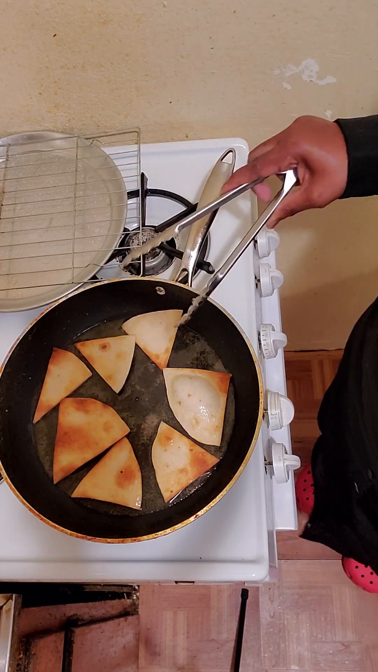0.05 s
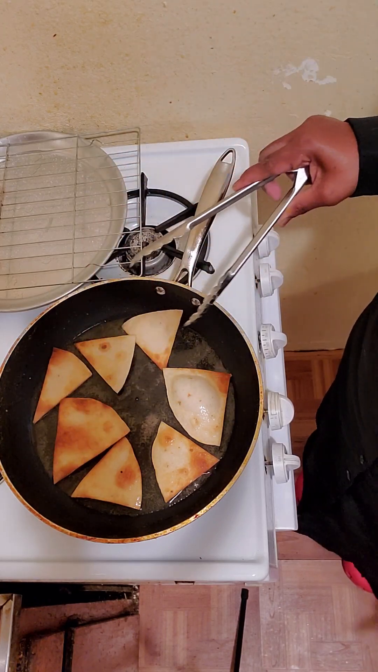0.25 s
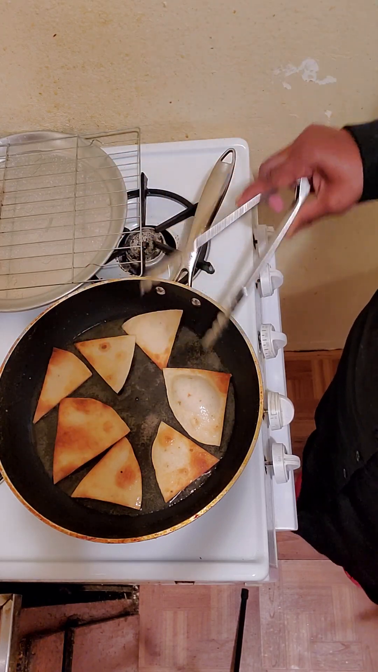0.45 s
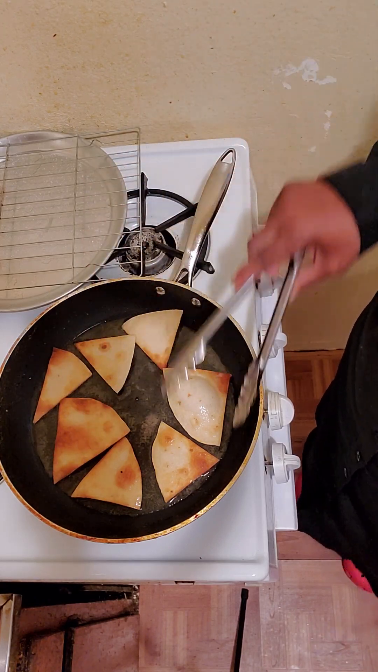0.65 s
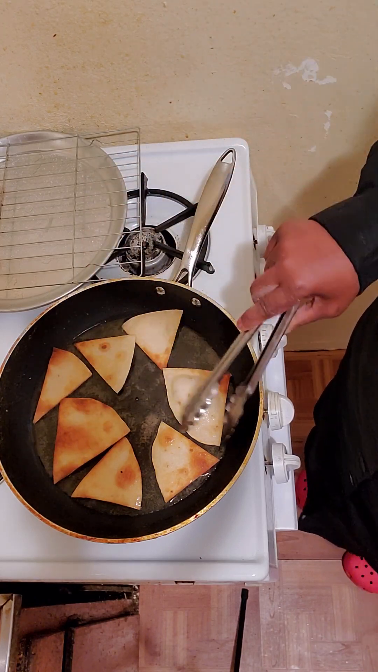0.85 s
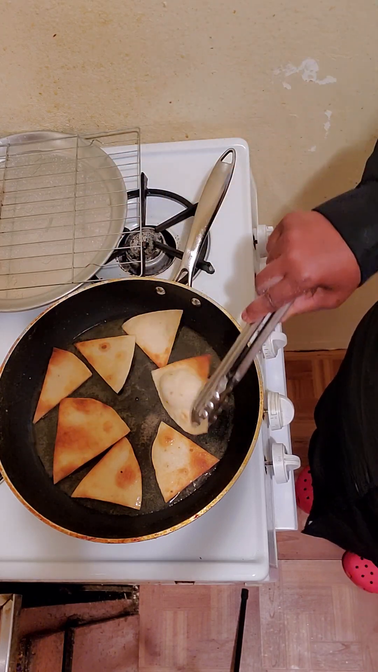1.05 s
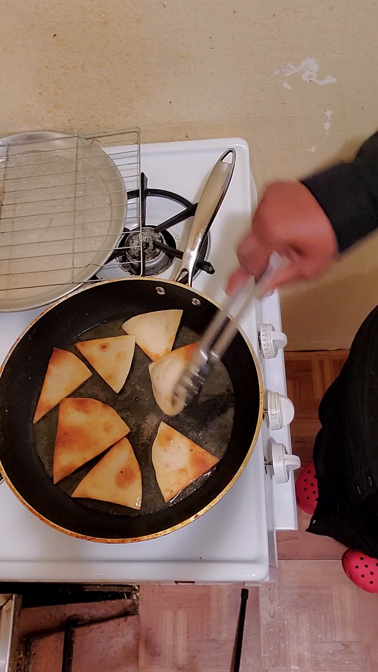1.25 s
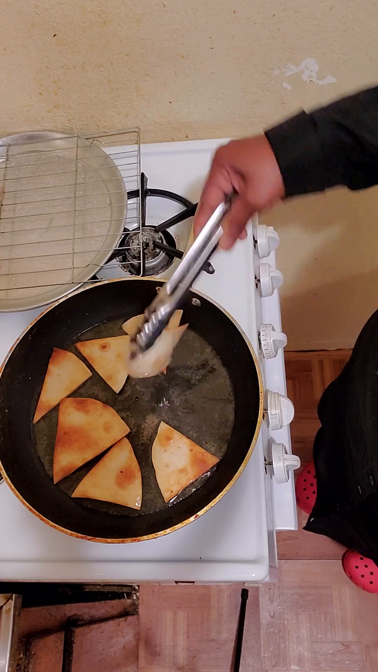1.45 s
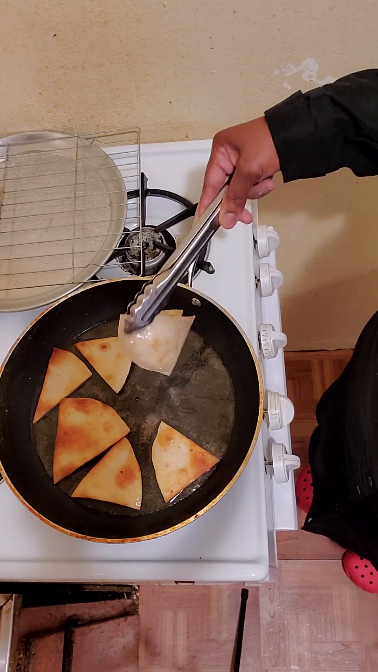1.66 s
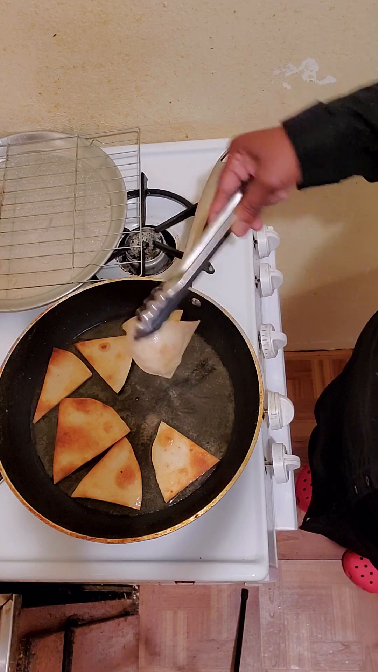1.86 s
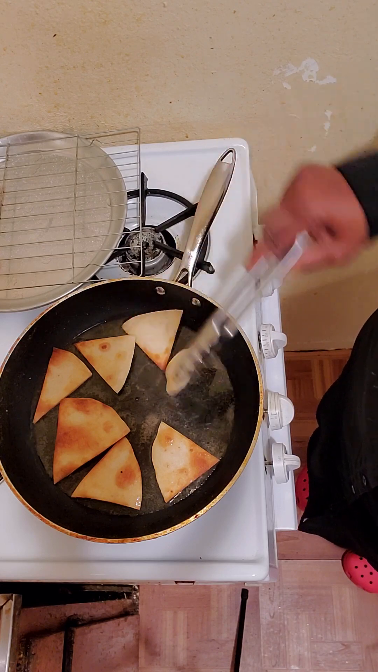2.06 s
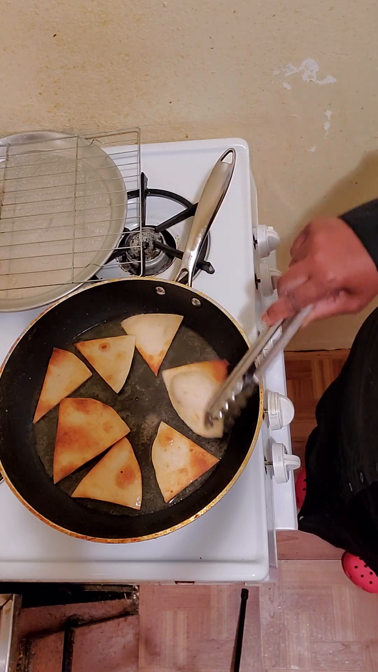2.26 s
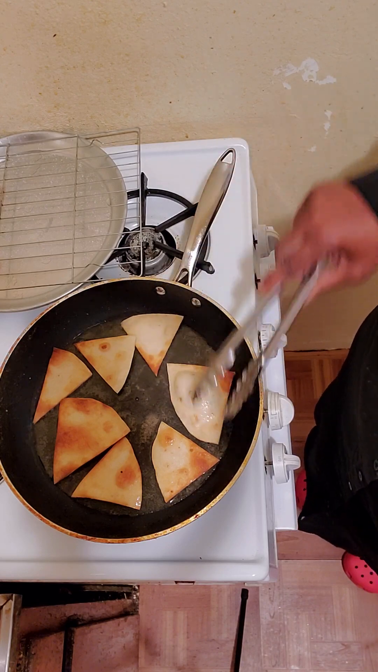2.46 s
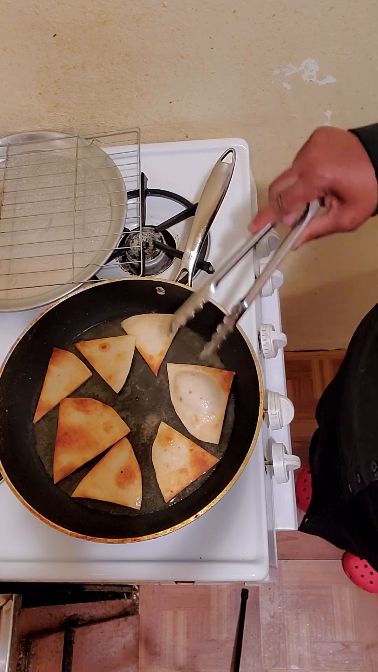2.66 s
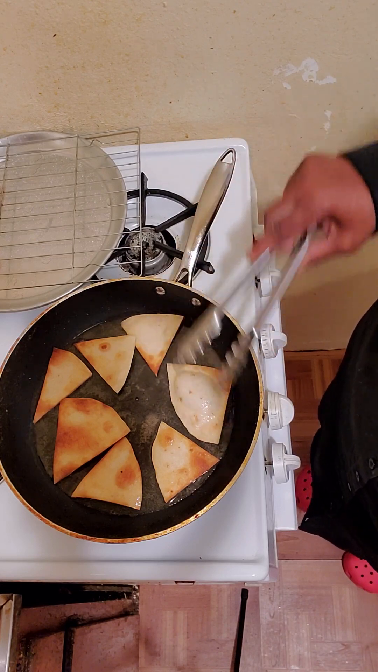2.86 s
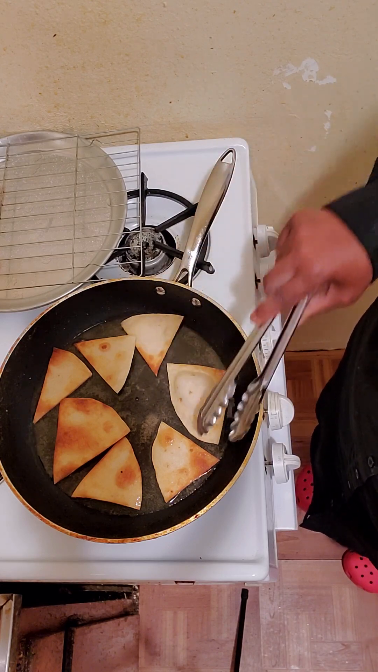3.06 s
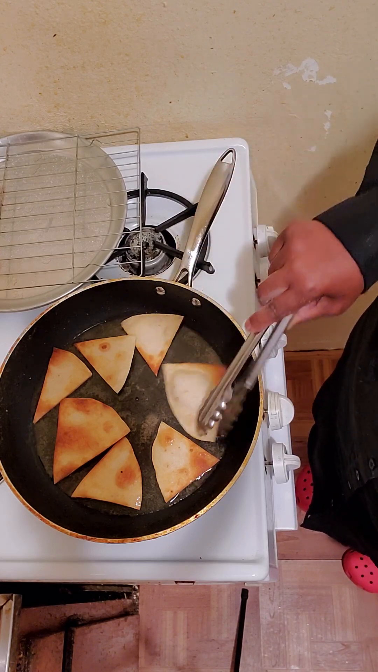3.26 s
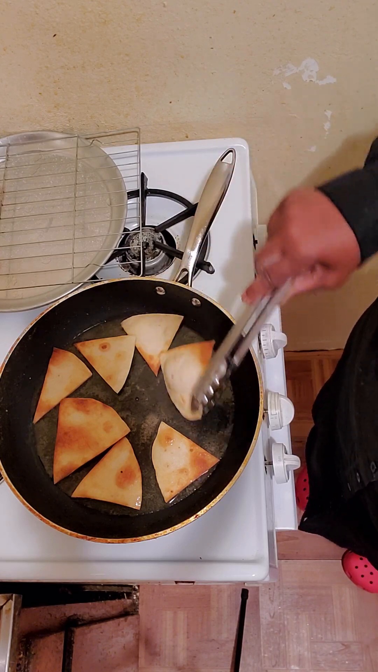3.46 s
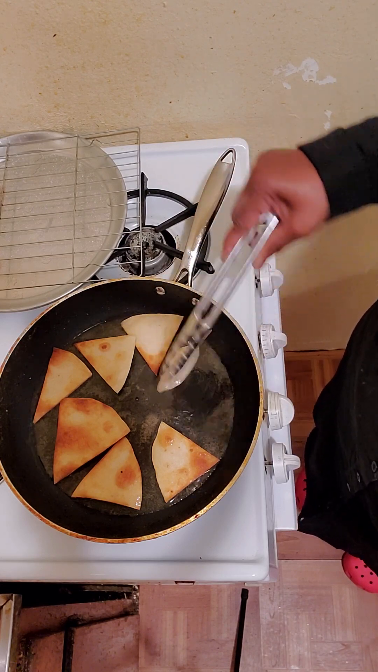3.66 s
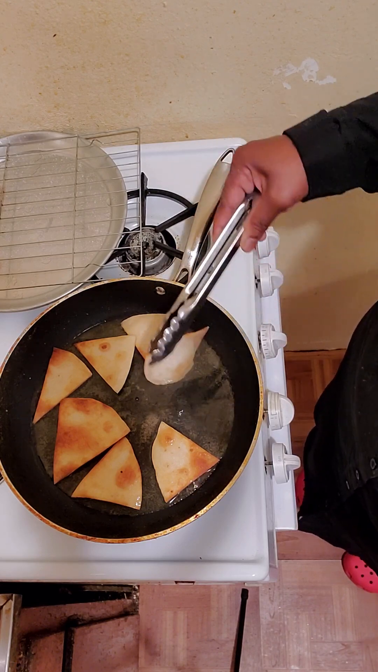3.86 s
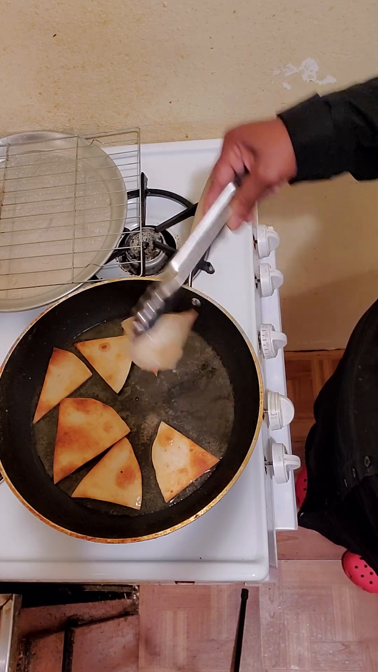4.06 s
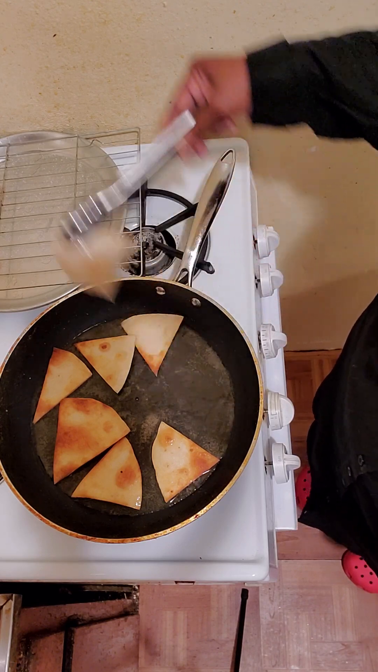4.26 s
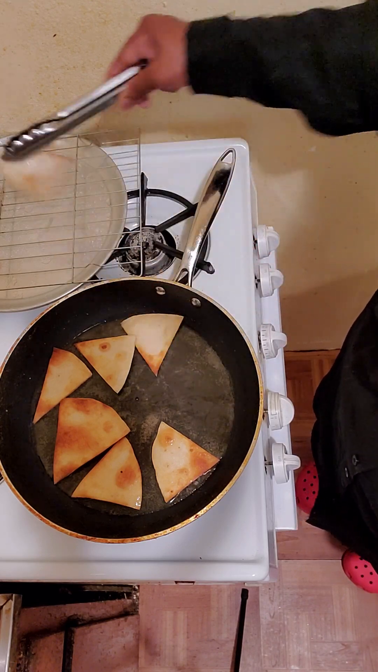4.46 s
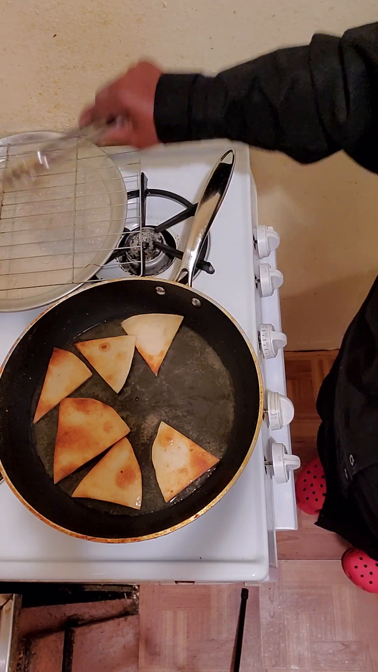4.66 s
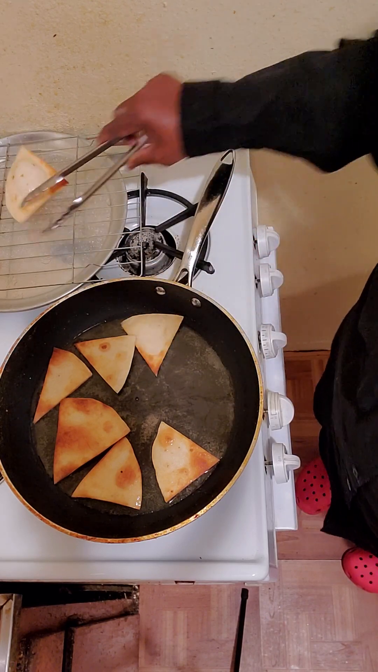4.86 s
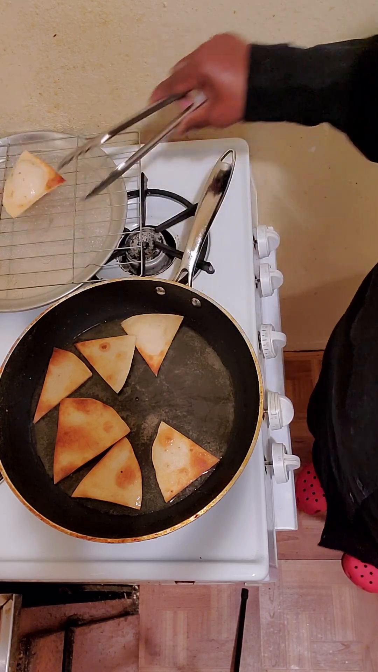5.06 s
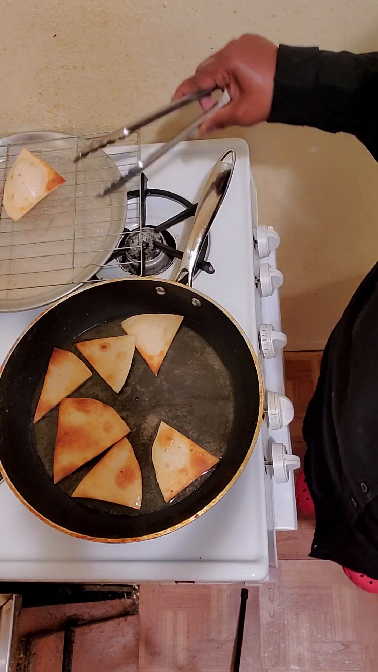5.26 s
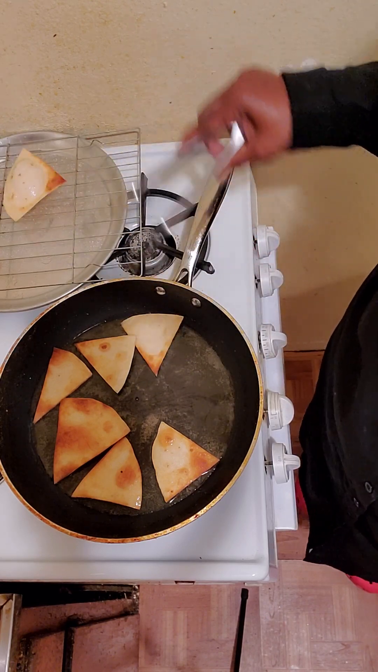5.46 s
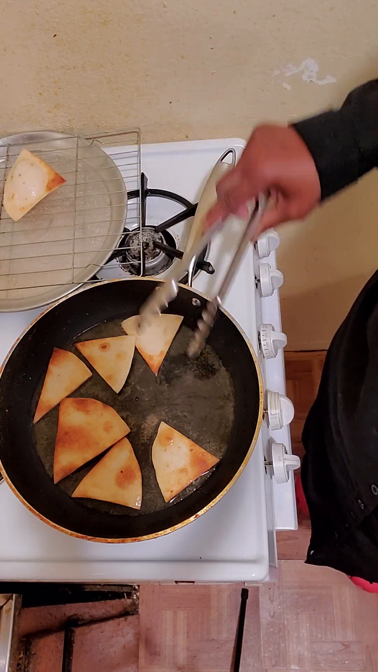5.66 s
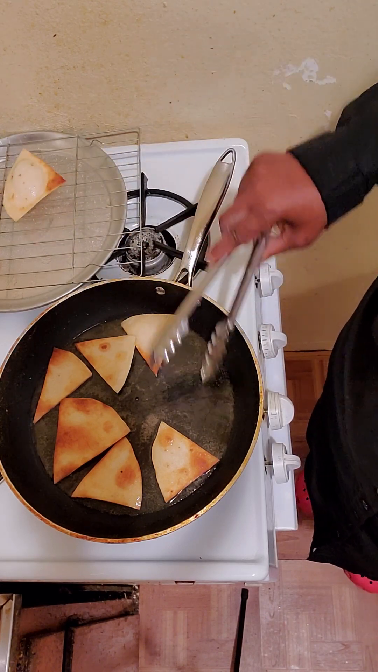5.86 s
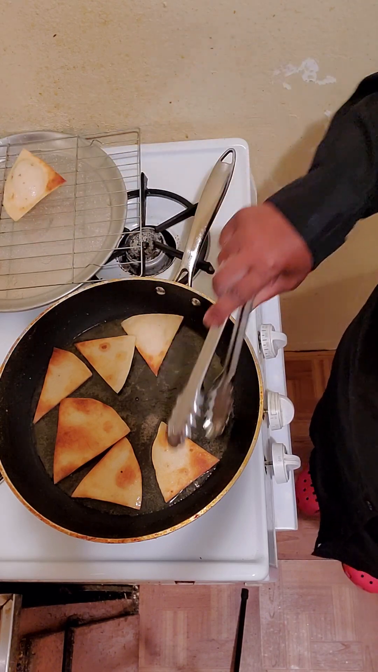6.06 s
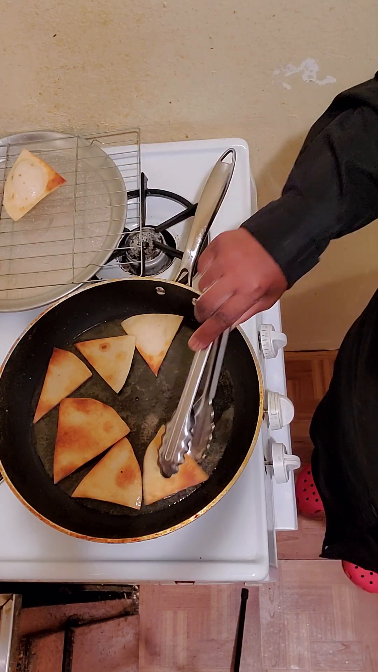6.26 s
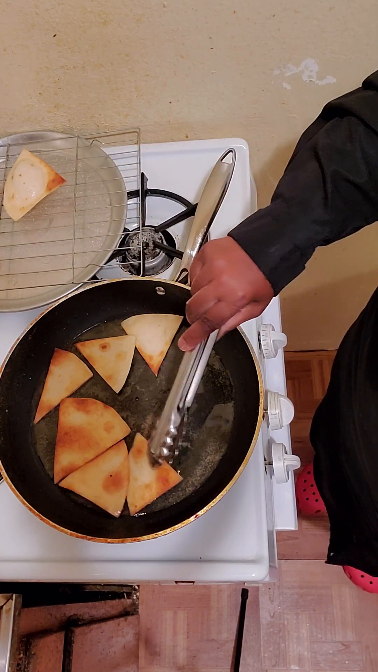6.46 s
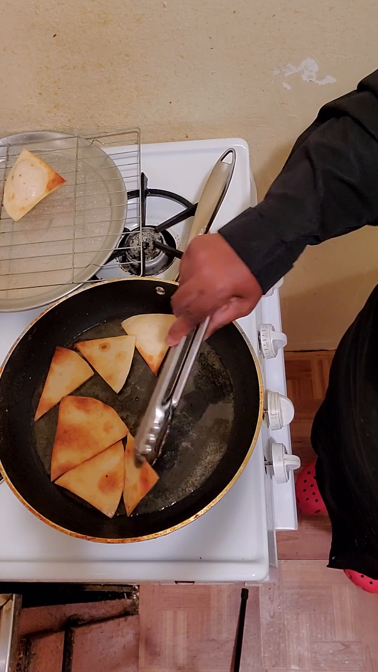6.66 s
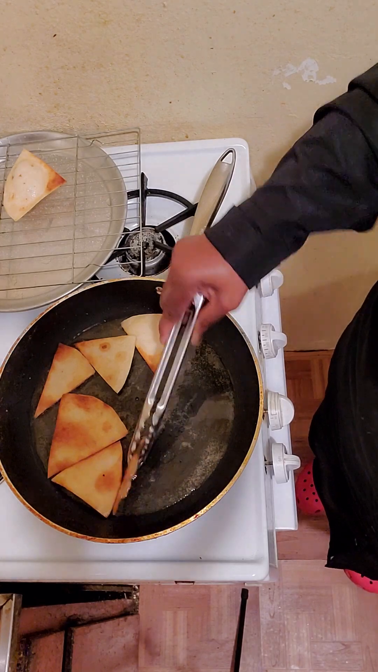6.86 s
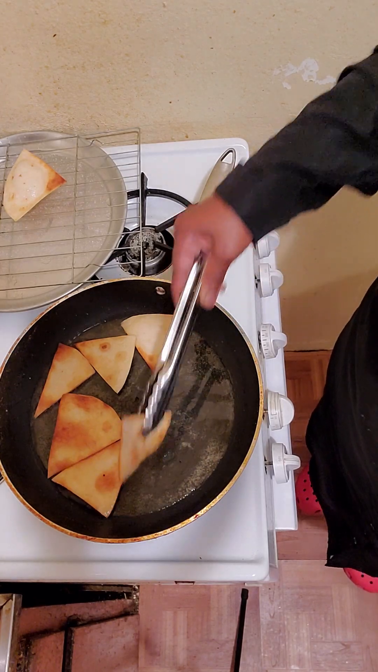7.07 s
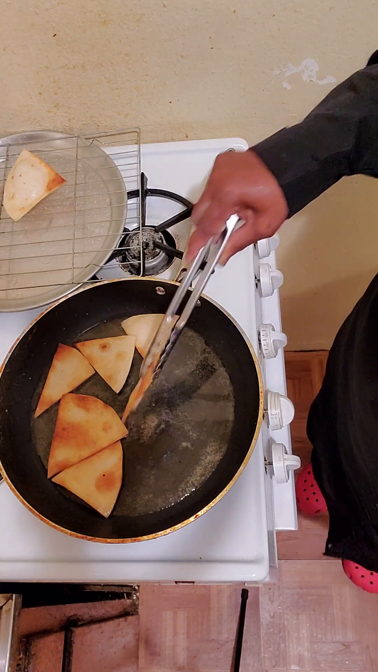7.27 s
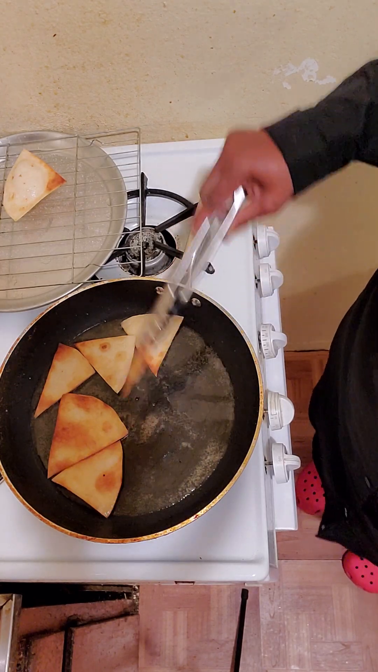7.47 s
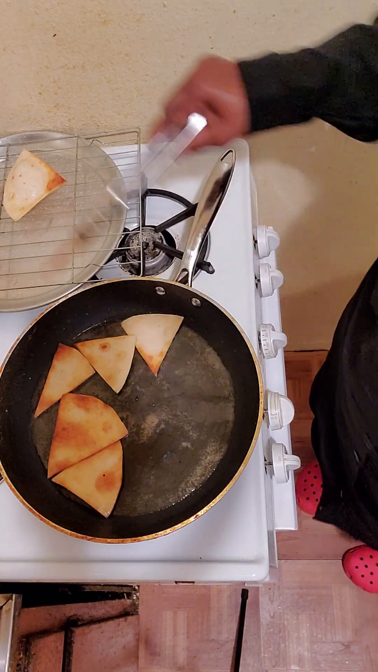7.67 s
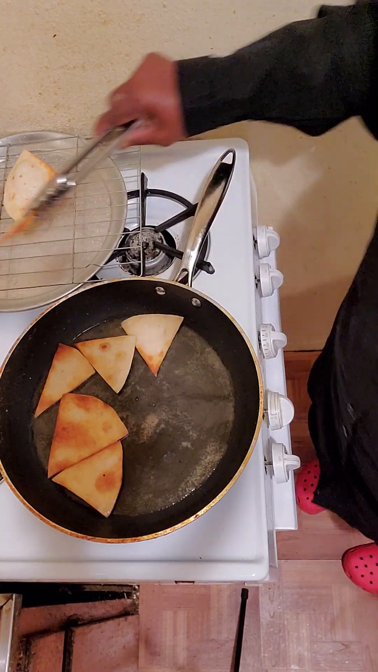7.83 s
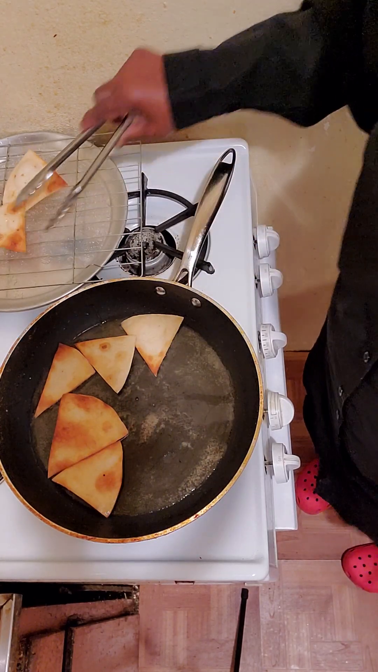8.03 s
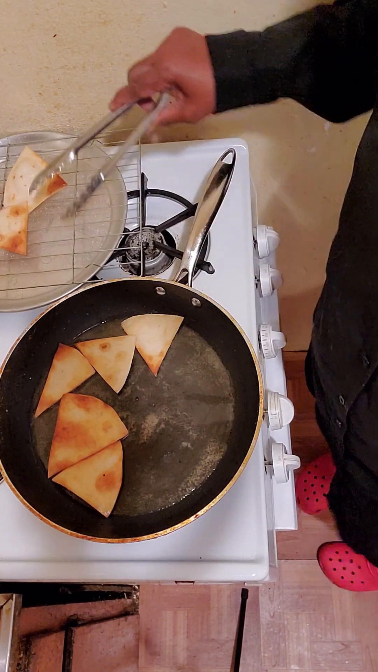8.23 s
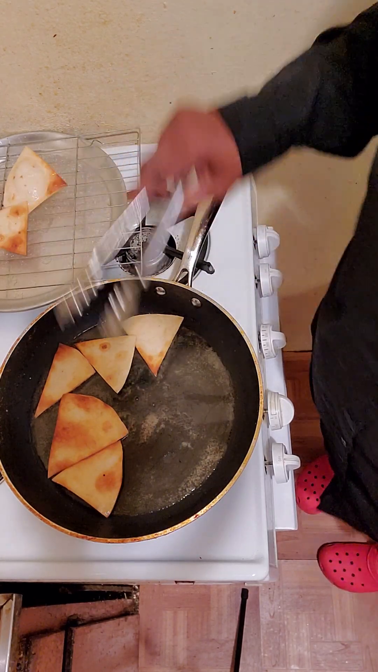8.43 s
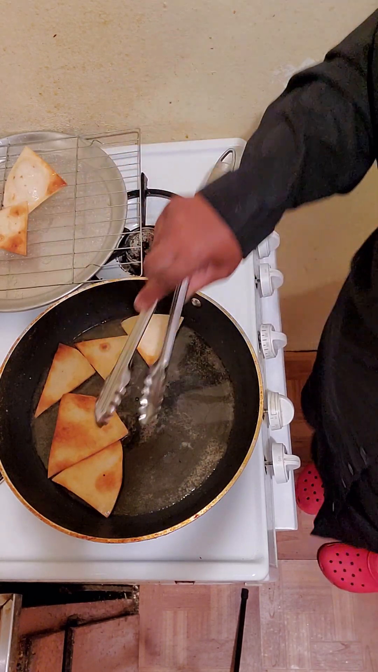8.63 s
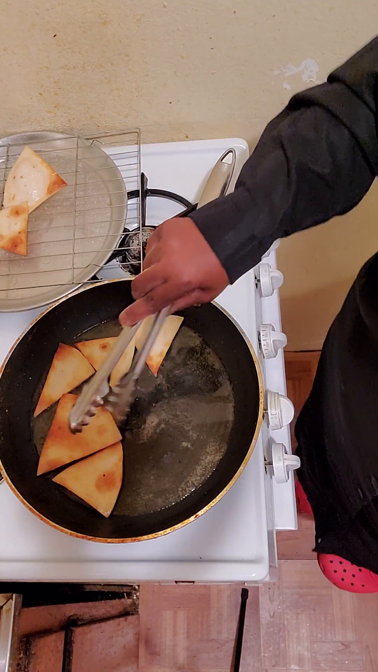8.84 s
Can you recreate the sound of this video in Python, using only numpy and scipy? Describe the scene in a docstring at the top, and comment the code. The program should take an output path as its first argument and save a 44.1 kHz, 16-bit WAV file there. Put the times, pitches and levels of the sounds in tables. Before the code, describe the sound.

Steel tongs turn pastries in a frying pan, heard from above with a short kitchen echo. Scattered ringing taps and muffled bumps come first, with one tiny squeak. Then the tongs spring open twice with bright, scraping clinks, each time followed by the dull knock of pastry on a wire rack, with a sharp click of the tips in between. A faint oil sizzle, burner rumble and motor hum continue throughout.

```python
"""Tongs in a frying pan

Steel tongs turn pastries in shallow oil on a gas stove, heard from above in a small kitchen.
The tips knock on the pan, nudge the pastries and pinch shut. Twice the tongs spring open over
a tray, scraping and bouncing on their hinge stop, and pastry drops. Underneath, the oil sizzles
faintly, the burner rumbles and an appliance hums."""
import sys
import numpy as np
from scipy import signal
from scipy.fft import rfft, irfft, next_fast_len
from scipy.io import wavfile

SR = 44100
rng = np.random.default_rng(int(sys.argv[2]) if len(sys.argv) > 2 else 0)


def log_audio(samples):
    """Write samples as a 16-bit WAV file to the path given in sys.argv[1]."""
    # one column per channel
    frames = np.atleast_2d(samples).T
    # limit to full scale, then quantise
    limited = np.clip(frames, -1, 1)
    pcm = np.round(limited * 32767).astype(np.int16)
    wavfile.write(sys.argv[1], SR, pcm)


N = 392487
AGE = np.arange(int(.5 * SR)) / SR  # seconds since a hit


# The tones of pan and tips. Each row: pitch in Hz, level in dB, seconds to fade by 60 dB (t60).
PAN_TONES = [(328, -9, .17), (540, -2, .1), (568, 0, .15), (861, -15, .3), (940, -4, .1), (982, -4, .24),
             (1009, -5, .12), (1290, -13, .13), (1450, -11, .2)]
TIP_TONES = [(1605, -3.5, 0.064), (1690, -9, 0.055), (2095, -1, 0.09), (2163, -5.5, 0.1),
             (2505, -0.5, 0.082), (2620, 1.5, 0.062), (2840, -3, 0.055), (2910, 5.5, 0.082),
             (3450, -6, 0.22), (3480, -12, 0.16), (3440, -30, 0.15), (4180, -18, 0.1), (4290, -4, 0.13),
             (4230, -0.5, 0.17), (4780, -4.5, 0.16), (5070, -1, 0.14), (5280, 5, 0.036), (5810, 3.5, 0.09),
             (6490, -8, 0.22), (6220, 5, 0.055), (6900, 3, 0.048), (7250, 1, 0.037)]
# The crack of a tap. Each row: frequency in Hz, level in dB.
CRACK_COLOUR = [(100, -20), (250, 10.5), (700, -1.5), (1500, 8), (2700, 3.5), (4500, 8), (6700, 10.5),
                (8500, 4.5), (12000, -7), (16000, -46.5)]
# Taps on the pan. Each row: start in seconds, tongs level in dB, pan level in dB,
# treble cut-off in Hz, boosted frequency in Hz, stretch of the pan's ring time.
PAN_TAPS = [(0.9433, -32.5, -41, 9500, 2600, 3), (2.4956, -24, -28.5, 13000, 4300, 1.06),
            (3.2238, -35, -52.5, 14000, 1580, 2.5), (3.243, -36.5, -45, 2220, 1650, 1.65),
            (3.301, -50, -61, 6000, 5000, 1), (8.8284, -38, -34.5, 3850, 960, 0.72)]

def taps(tips_db=-4, arms_db=-3, food_db=-20):
    """The tips hit the pan: a tick, then pan, tips and gripped arms ring; jolted food adds a knock."""
    out = np.zeros((2, N))
    for start, steel_db, pan_db, soft_hz, spot_hz, hold in PAN_TAPS:
        crack = burst(CRACK_COLOUR, t60=.14)
        tick = gain(1) * burst(SCRAPE_COLOUR, t60=.1)
        steel = crack + gain(tips_db) * ring(TIP_TONES) + gain(arms_db) * (arms(hold=.16) + tick)
        pan = ring(PAN_TONES, hold) + gain(food_db) * burst(CRUST_COLOUR, t60=.15)
        tap = attack(gain(steel_db) * steel + gain(pan_db) * pan, rise_s=.00046)
        add(out, start, contact(tap, soft_hz, spot_hz))
    return out


# The hinge meets its stop. Each row: start in seconds, level in dB, seconds of contact.
HINGE_HITS = [(4.945, -34.5, 0.0018), (4.977, -31.5, 0.024), (5.084, -46, 0.0034), (5.1898, -39, 0.0027),
              (5.27, -54.5, 0.0044), (8.102, -35, 0.02), (8.126, -27, 0.02), (8.365, -32.5, 0.0036),
              (8.393, -40, 0.0027), (8.482, -43, .0038), (8.517, -43.5, 0.0023), (8.575, -51.5, 0.0039)]
# Scraping steel and the handle's thud. Each row: frequency in Hz, level in dB.
SCRAPE_COLOUR = [(150, -15), (600, -13), (1500, -10), (2400, 11.5), (6500, 19.5), (8500, 8), (12000, 10),
                 (14000, 11.5), (15800, 7.5)]
THUD_COLOUR = [(90, -19), (160, -21), (225, 2.5), (350, -8.5), (650, -13), (1250, -12), (2000, -13),
               (6000, -19)]

def clinks(hard_hit_db=-20, slide_db_per_s=190, chatter_db=3):
    """The hinge slides and hits its stop: its chatter rings the free arms and jolts the handle."""
    out = np.zeros((2, N))
    for start, db, length in HINGE_HITS + bounces():
        # Harder hits scrape more, thud more and ring longer; longer slides scrape more too.
        force_db = db - hard_hit_db
        scrape_db = .5 * force_db + slide_db_per_s * length
        thud_db = -9 + .12 * force_db
        hold = .58 * 2 ** (force_db / 46)
        chatter = gain(chatter_db * drift(600)[:len(AGE)])
        scrape = gain(scrape_db) * burst(SCRAPE_COLOUR, .22, length) * chatter
        thud = gain(thud_db) * burst(THUD_COLOUR, .43, length)
        clink = arms(hold, length) + scrape + thud
        add(out, start, gain(db) * attack(clink, rise_s=.0011 + .051 * length))
    return out


def bounces(start=8.1315, db=-19.5, gap_s=.0472, loss_db=4, contact_s=.0022, count=4):
    """The spring flings the arms against the stop: evenly spaced hinge hits, each one weaker."""
    return [(start + k * gap_s, db - k * loss_db, contact_s) for k in range(count)]


# The arms' clear tones. Each row: pitch in Hz, level in dB, fade time in seconds.
ARM_TONES = [(1272, -8, .4), (1814, -15, .5), (1902, -12, .35), (2310, -10, .45), (3015, -7, .3),
             (3078, -1, .35), (3300, -6, .22), (3397, -11, .5), (3466, -6, .3), (3610, -5, .25),
             (3848, -6, .4), (3975, -6, .24), (4730, -7, .25), (5190, -4, .22), (5665, -5, .22),
             (5750, 1, .27), (5955, -2, .25), (6330, -5, .25), (6563, 0, .3), (6733, -2, .3),
             (7020, -9, .3), (7337, -1, .22), (7470, 1, .3), (7655, -3, .2), (8000, -5, .17)]
# Their many weak tones, blurred into noise. Each row: frequency in Hz, level in dB.
SHIMMER_COLOUR = [(200, -59), (1500, -64), (2600, -27), (3100, 6), (3900, 19), (4500, 5), (5800, -4),
                  (7500, 8), (8500, 4), (12000, -3), (16000, -67)]

def arms(hold, length=0):
    """The thin steel arms ring with clear tones over a shimmer."""
    shimmer = gain(-5) * burst(SHIMMER_COLOUR, .28 * hold, length)
    return gain(-4.5) * ring(ARM_TONES, hold, length) + shimmer


# The tips pressed together. Each row: pitch in Hz, level in dB, fade time in seconds.
SHUT_TONES = [(3060, 0.5, 0.083), (3280, -2, 0.059), (3900, -6, .08), (4900, -9, .12), (5100, -2, 0.12),
              (6360, -1, .11), (7760, 3, .12)]
# Their click. Each row: frequency in Hz, level in dB.
PINCH_COLOUR = [(300, -14), (1500, -16), (2400, -8), (3200, 3.5), (3700, -1), (5000, -1), (6400, 2),
                (8000, -4.5), (11000, -7.5), (13500, -11), (16000, -18)]
# The tongs close. Each row: start in seconds, level in dB.
PINCHES = [(6.1866, -27), (6.62, -56.5)]

def pinches():
    """Tip meets tip: a dry, bright click, the squeezed arms barely ringing."""
    out = np.zeros((2, N))
    for start, db in PINCHES:
        click = gain(5) * burst(PINCH_COLOUR, t60=.076)
        steel = gain(-7) * arms(hold=.18) + gain(-5) * ring(SHUT_TONES)
        add(out, start, gain(db) * attack(click + steel, rise_s=.00074))
    return out


# A knock on crust. Each row: frequency in Hz, level in dB.
CRUST_COLOUR = [(120, 0.5), (330, 7), (550, 2), (950, 0), (1300, -7.5), (2000, -9), (5000, 1.5),
                (16000, -33)]
# Pushes on a pastry. Each row: start in seconds, level in dB, treble cut-off in Hz.
PASTRY_NUDGES = [(1.022, -40, 500), (1.17, -49, 1800), (1.347, -54.5, 2200), (2.247, -50.5, 2000),
                 (3.369, -41, 600), (3.492, -50, 2500), (6.189, -36, 1000), (6.89, -57, 4000)]

def nudges():
    """A pastry bumps the pan: a soft knock of crust and a short, muffled ring."""
    out = np.zeros((2, N))
    for start, db, soft_hz in PASTRY_NUDGES:
        knock = burst(CRUST_COLOUR, t60=.15) + gain(-7) * ring(PAN_TONES, hold=.34)
        add(out, start, gain(db) * contact(attack(knock, rise_s=.0013), soft_hz, spot_hz=980))
    return out


# Falling pastry. Each row: start in seconds, level in dB.
PASTRY_DROPS = [(5.14, -45), (8.319, -30), (8.442, -43)]

def drops():
    """A pastry lands on the wire rack with a dull, dry knock."""
    out = np.zeros((2, N))
    for start, db in PASTRY_DROPS:
        knock = burst(CRUST_COLOUR, t60=.14)
        add(out, start, gain(db) * contact(knock, soft_hz=3500, spot_hz=1150))
    return out


def squeak(start=3.448, length=.08, hz=4270, tone_db=-57, rub_db=-60):
    """A tip drags over the pan, rubbing and singing one brief, unsteady note."""
    progress = np.clip((np.arange(N) / SR - start) / length, 0, 1)
    swell = 2 * np.sqrt(progress * (1 - progress))
    pitch = hz * (1 + .0069 * drift(600))
    tone = np.sin(2 * np.pi * np.cumsum(pitch) / SR) * (1 + .47 * drift(90))
    return swell * (gain(tone_db) * tone + gain(rub_db) * noise(CRACK_COLOUR, N))


# Hot oil. Each row: frequency in Hz, level in dB.
OIL_COLOUR = [(400, -23), (1500, -7), (2700, 3.5), (4500, 1), (7000, 2.5), (12000, -10), (16000, 4)]

def sizzle(hiss_db=-57, pops_db=-67, pops_per_s=900, spread_db=4):
    """Countless steam bubbles merge into an even hiss; the larger ones burst as faint ticks."""
    sizes = rng.standard_normal((2, N)) * gain(spread_db * rng.standard_normal(N))
    pops = colour((rng.random(N) < pops_per_s / SR) * sizes, OIL_COLOUR)
    return gain(hiss_db) * noise(OIL_COLOUR, N) + gain(pops_db) * pops / pops.std()


# The gas flame, the room's air and the motor's tones. Each row: frequency in Hz, level in dB.
BURNER_COLOUR = [(15, -20), (24, -24.5), (35, -1.5), (44, -16), (58, -0.5), (72, -10), (88, -8.5),
                 (110, -24), (150, -29.5), (205, -18), (280, -28), (600, -32.5), (2000, -38.5)]
AIR_COLOUR = [(100, -9.5), (250, -4), (400, 4), (480, -2.5), (630, -0.5), (780, -2), (1050, -6.5),
              (1270, 1), (1600, -10), (4000, -18)]
MOTOR_TONES = [(58, -57.5), (172, -65), (348, -76.5), (522, -75.5), (638, -75.5)]

def background(burner_db=-51, air_db=-62, waver_db=2):
    """The burner rumbles, the room's air murmurs and a motor hums, wavering a little."""
    motor_time = np.cumsum(1 + .00421 * drift(6)) / SR
    hum = 0
    for hz, db in MOTOR_TONES:
        hum += gain(db + waver_db * drift(4.7)) * np.sqrt(2) * np.sin(2 * np.pi * hz * motor_time)
    return gain(burner_db) * noise(BURNER_COLOUR, N) + gain(air_db) * noise(AIR_COLOUR, N) + hum


def kitchen_echo(x, echo_db=-9, split_hz=2500):
    """Close, hard walls add a short wash of echo that gets duller as it dies."""
    air = stereo_noise(len(AGE))
    low = signal.sosfilt(signal.butter(1, split_hz, fs=SR, output="sos"), air)
    tail = attack(low * fade(t60=.34) + (air - low) * fade(t60=.11), rise_s=.0046)
    tail /= np.linalg.norm(tail[0])
    return x + gain(echo_db) * signal.fftconvolve(x, tail, axes=1)[:, :N]


def ring(tones, hold=1, length=0, apart_hz=2200):
    """Struck metal rings; hold stretches its fade, and chatter jolts it for length seconds."""
    out = np.zeros((2, len(AGE)))
    for hz, db, t60 in tones:
        side, shift, scatter_db = rng.standard_normal(3)
        jolts = np.cumsum(.07 * rng.standard_normal(len(AGE)) * (AGE < length)) if length else 0
        phase = 2 * np.pi * hz * AGE + shift * min(hz / apart_hz, 2) + jolts
        # High tones reach left and right out of step.
        lag = np.sign(side) * min(hz / apart_hz, 1) * np.pi / 4 * np.array([[1], [-1]])
        out += gain(db + scatter_db) * fade(max(t60 * hold, .01), length) * np.sin(phase + lag)
    return out


def contact(x, soft_hz, spot_hz, spot_gain=1.4, sharpness=6):
    """A soft touch cuts treble above soft_hz; the spot that is hit boosts tones near spot_hz."""
    hz = np.fft.rfftfreq(x.shape[1], 1 / SR) + 1
    soft = 1 / (1 - (hz / soft_hz) ** 2 + 1j * np.sqrt(2) * hz / soft_hz)
    spot = 1 + spot_gain / (1 + 1j * sharpness * (hz / spot_hz - spot_hz / hz))
    return irfft(rfft(x) * soft * spot, x.shape[1])


def attack(sound, rise_s):
    """Let a sound rise quickly from silence."""
    return sound * (1 - np.exp(-AGE / rise_s))


def fade(t60, length=0):
    """Stay level for length seconds, then fall 60 dB every t60 seconds."""
    return np.exp(-np.log(1000) * np.maximum(AGE - length, 0) / t60)


def burst(points, t60, length=0):
    """A puff of noise that dies away."""
    return noise(points, len(AGE)) * fade(t60, length)


def noise(points, size):
    """Coloured stereo noise at a standard level of 1."""
    x = colour(stereo_noise(size), points)
    return x / x.std()


def colour(x, points):
    """Turn each frequency up or down, following a curve through (Hz, dB) points."""
    hz, db = np.transpose(points)
    size = next_fast_len(x.shape[-1])
    freqs = np.maximum(np.fft.rfftfreq(size, 1 / SR), 1)
    curve = gain(np.interp(np.log(freqs), np.log(hz), db))
    return irfft(rfft(x, size) * curve, size)[..., :x.shape[-1]]


def stereo_noise(size, alike_hz=900):
    """White noise, left and right alike in the bass but unrelated in the treble."""
    padded = next_fast_len(size)
    mid, side = rfft(rng.standard_normal((2, padded)))
    alike = 1 / (1 + (np.linspace(0, SR / 2, len(mid)) / alike_hz) ** 2)
    mid, side = mid * np.sqrt(1 + alike), side * np.sqrt(1 - alike)
    return irfft(np.array([mid + side, mid - side]), padded)[:, :size] / np.sqrt(2)


def drift(rate):
    """Glide to a new random value rate times a second."""
    targets = rng.standard_normal(int(N / SR * rate) + 2)
    return np.interp(np.arange(N) / SR * rate, np.arange(len(targets)), targets)


def gain(db):
    """Turn decibels into a multiplier."""
    return 10 ** (np.asarray(db) / 20)


def add(out, start, sound):
    """Mix a sound in at start seconds."""
    first = int(start * SR)
    out[:, first:first + sound.shape[1]] += sound[:, :N - first]


def scene():
    """Tongs and food in the room, over the steady sounds of the stove."""
    cooking = taps() + nudges() + pinches() + clinks() + drops() + squeak()
    return kitchen_echo(cooking) + sizzle() + background()


# How the microphone hears. Each row: frequency in Hz, boost or cut in dB.
MIC_COLOUR = [(20, 0), (7700, 2), (8500, -1.5), (9400, -9.5), (10500, -4.5), (11700, 4.5), (13000, 5.5),
              (20000, -1.5)]

def record(dry, top_hz=15950):
    """The microphone's openings hollow out a band of treble; the very top is cut off."""
    top_cut = signal.ellip(10, .2, 70, top_hz, fs=SR, output="sos")
    return signal.sosfilt(top_cut, colour(dry, MIC_COLOUR))


dry = scene()
out = record(dry)
log_audio(out)
```